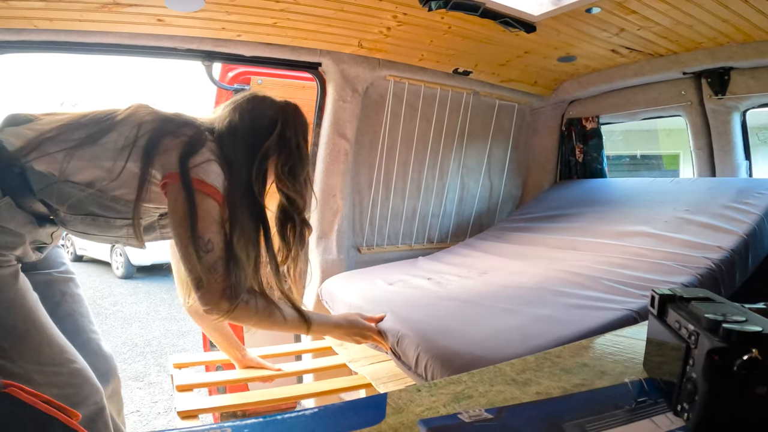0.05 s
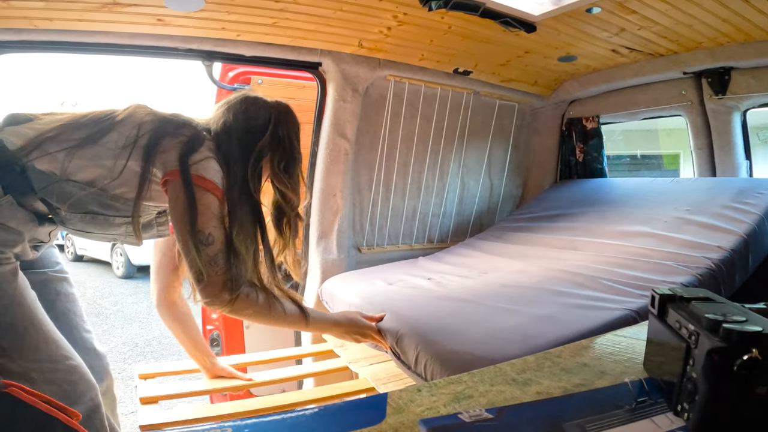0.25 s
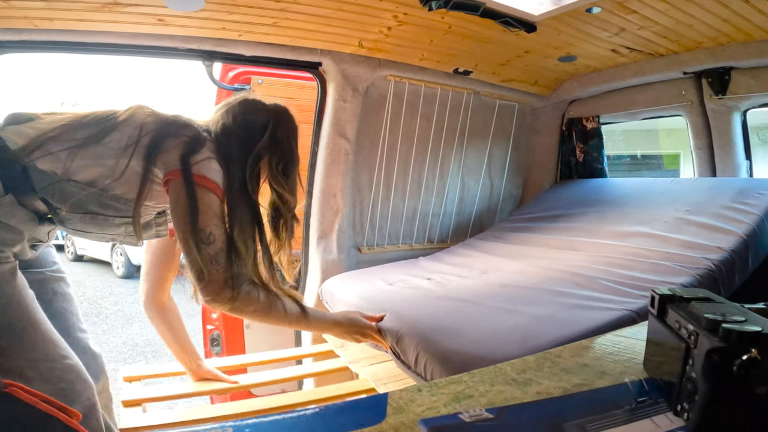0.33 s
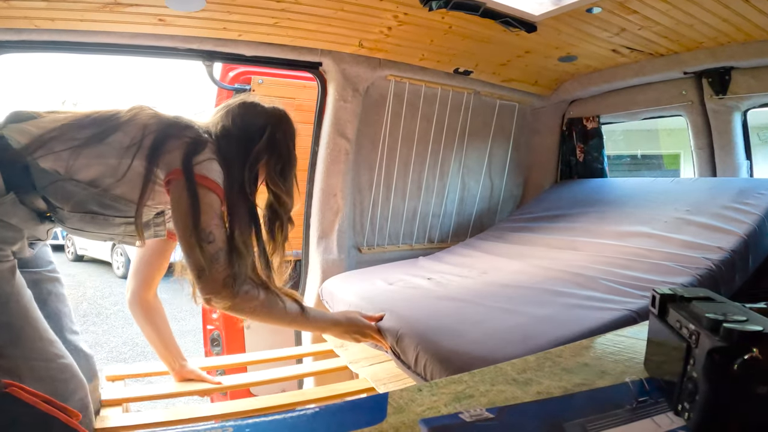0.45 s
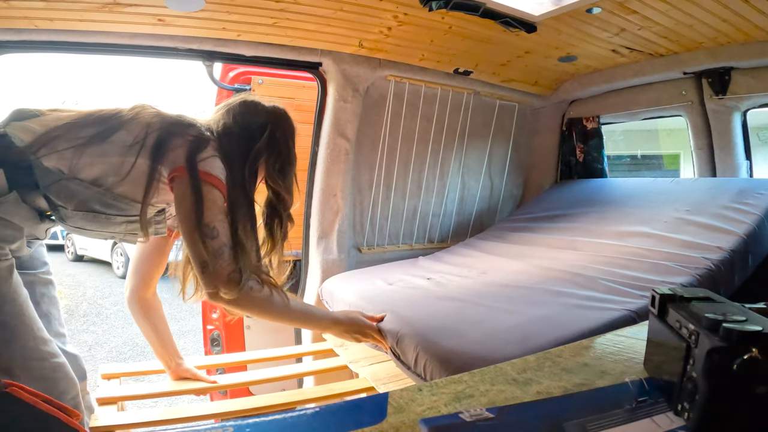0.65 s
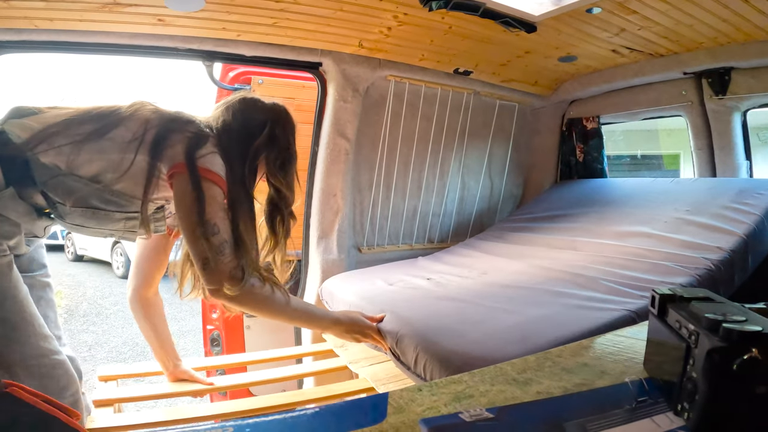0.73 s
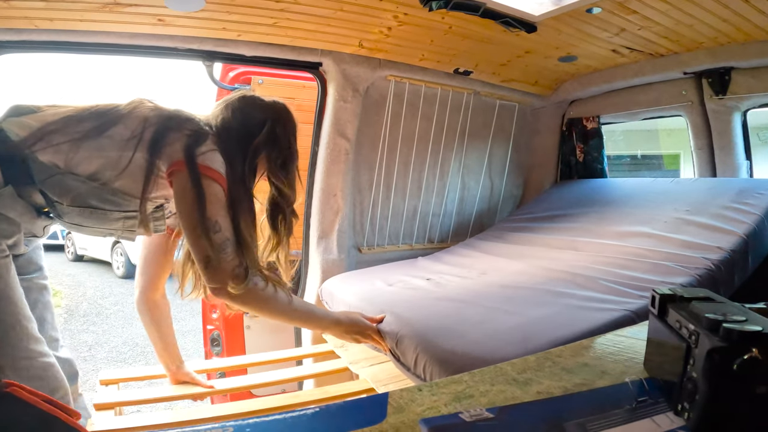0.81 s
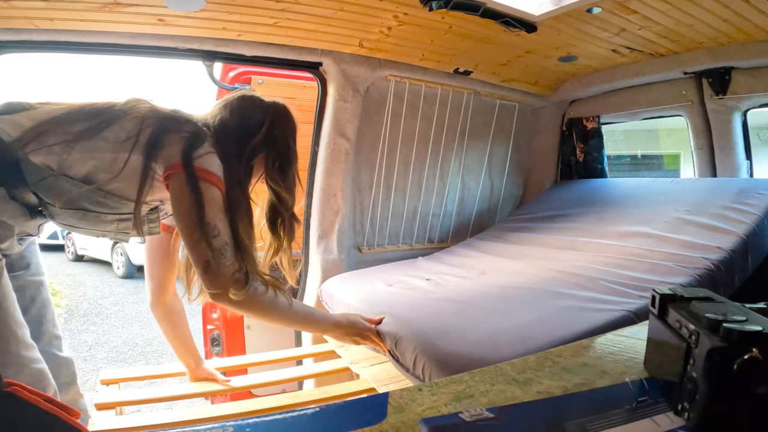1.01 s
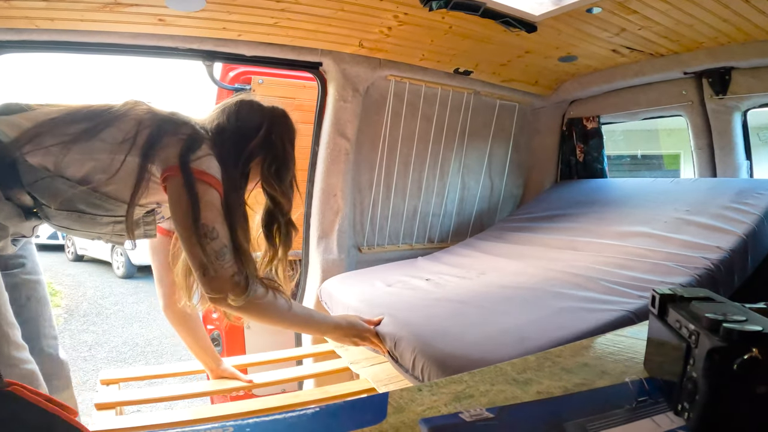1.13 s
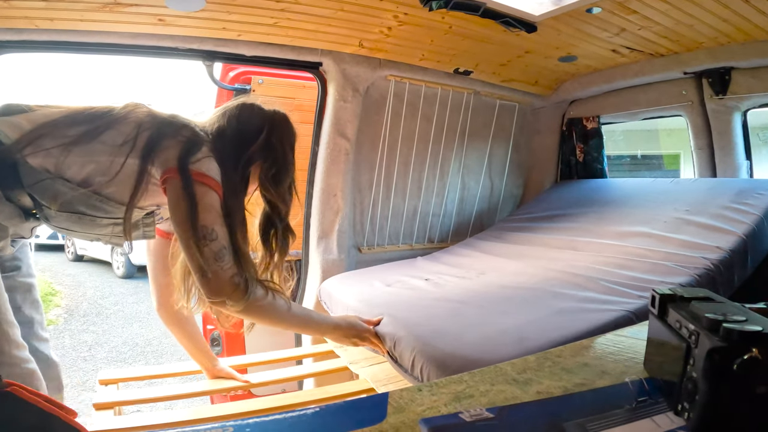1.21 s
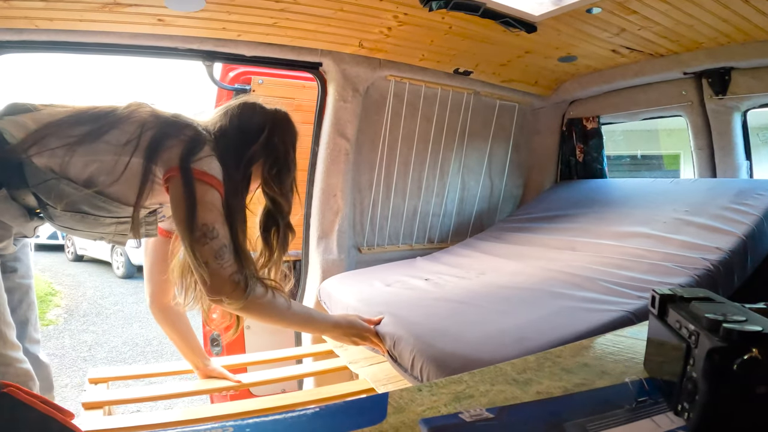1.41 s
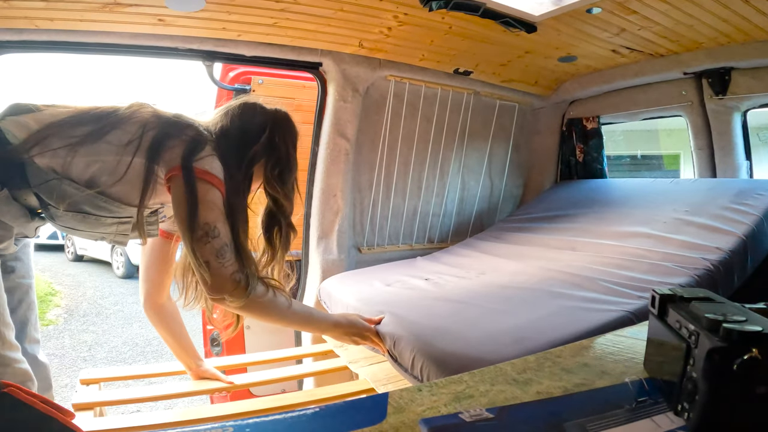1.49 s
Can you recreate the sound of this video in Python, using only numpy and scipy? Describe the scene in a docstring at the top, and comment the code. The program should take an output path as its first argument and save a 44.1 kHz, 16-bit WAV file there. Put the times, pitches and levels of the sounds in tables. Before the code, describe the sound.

Wooden slats scrape and knock as a couch base is dragged, then thump down.

```python
"""The slatted base of a pull-out couch is dragged out inside a small van.
Stick-slip friction makes the slats scrape and judder; impacts excite the wood's damped modes as they
knock hard against the frame, slide on and settle with a dull thump. Loose slats tap lightly.
The mattress cover swishes over the wood, fibre by fibre, and the dragging starts again.
Faint outdoor noise enters through the open door."""
import sys
import numpy as np
from scipy import signal
from scipy.io import wavfile

SR = 44100
rng = np.random.default_rng(int(sys.argv[2]) if len(sys.argv) > 2 else 0)


def dump(signal):
    """Clip the signal to [-1, 1] and save it as 16-bit WAV at the path in sys.argv[1]."""
    limited = np.clip(np.atleast_2d(signal).T, -1, 1)
    pcm = np.round(limited * 32767).astype(np.int16)
    wavfile.write(sys.argv[1], SR, pcm)


N = 68355


def amp(db):
    """Amplitude ratio of a level in decibels."""
    return 10 ** (np.asarray(db) / 20)

def unit(x):
    """Normalisation to rms 1."""
    return x / np.sqrt(np.mean(x ** 2) + 1e-20)

def add(mix, onset_s, sound):
    """Superposition of a delayed sound on the mix."""
    part = mix[max(round(onset_s * SR), 0):][:len(sound)]
    part += sound[:len(part)]

def colour(x, spectrum, size=8192):
    """Minimum-phase filtering by a spectrum (f/Hz, level/dB); the result has rms 1."""
    f, db = np.transpose(spectrum)
    hz = abs(np.fft.fftfreq(size, 1 / SR))
    log_gain = np.log(amp(np.interp(np.log(hz + 1), np.log(f), db)))
    response = np.exp(np.conj(signal.hilbert(log_gain)))
    impulse = np.fft.ifft(response).real[:size // 2]
    return unit(signal.fftconvolve(x, impulse)[:len(x)])

def grains(per_s, spread_db):
    """Shot noise: tiny independent impacts of random size and sign."""
    size = amp(spread_db * np.minimum(rng.exponential(1, N), 4))
    return unit(size * rng.choice([-1, 1], N) * (rng.random(N) < per_s / SR))

def decay(t60, size=24000):
    """Exponential damping: 60 dB in t60 seconds."""
    return np.exp(-np.log(1000) * np.arange(size) / SR / t60)

def burst(spectrum, t60):
    """Dense damped vibrations merge into decaying noise, starting near rms 1."""
    envelope = decay(t60)
    noise = rng.standard_normal(len(envelope)) * envelope
    return np.sqrt(np.mean(envelope ** 2)) * colour(noise, spectrum)

def mode_ring(modes, build_cycles, size=24000):
    """Impulse response as a sum of damped modes, each swelling with a time constant of build_cycles."""
    t, ring = np.arange(size) / SR, np.zeros(size)
    for hz, db, t60 in modes:
        swell = 1 - np.exp(-t * hz / build_cycles)
        ring -= amp(db) * swell * decay(t60, size) * np.sin(2 * np.pi * hz * t)
    return signal.lfilter(*signal.butter(3, 88, "high", fs=SR), ring)  # deep bass hardly radiates


# spectrum of the outdoor air: f/Hz, level/dB
AIR_SPECTRUM = [(25, -14), (60, -5), (90, 4.5), (130, 3.5), (190, 4.5), (280, -2.5), (400, -6.5),
                (560, -25.5), (780, -7), (1300, -14), (3000, -25), (6000, -34), (11000, -49), (14000, -59)]

def outdoor_air():
    """Stationary noise, strongest in the bass, enters through the open door."""
    return amp(-51.5) * colour(rng.standard_normal(N), AIR_SPECTRUM)


def cabin(x, t60=0.087, wet_db=-9.5, shift_hz=3.98, patterns=3):
    """Reverberation: dense reflections off the van's panels, their pattern shifting as the slats move."""
    t, wet = np.arange(N) / SR, np.zeros(N)
    for k in range(patterns):
        tail = grains(per_s=2000, spread_db=0) * decay(t60, N)
        share = np.sqrt(2 / patterns) * np.cos(np.pi * (shift_hz * t + k / patterns))
        wet += signal.fftconvolve(x * share, tail / np.linalg.norm(tail))[:N]
    return x + amp(wet_db) * wet


# strokes of the cover: peak t/s, level/dB, 20 dB rise/s, 20 dB fall/s, relative ring/dB, relative hiss/dB
COVER_STROKES = [(.03, -55, 0.035, 0.079, -24, -6.5), (.08, -43.5, 0.016, 0.051, -7, -23),
                 (0.824, -44, 0.094, 0.14, -13, -17), (.96, -61, .12, 0.23, -23, -8.5),
                 (1.072, -47, 0.036, 0.077, -1, -11.5), (1.116, -38.5, 0.02, 0.068, -0.5, -27),
                 (1.156, -41.5, 0.092, 0.062, -18, -11.5), (1.227, -58, 0.052, 0.095, -24, -3.5),
                 (1.335, -54.5, 0.15, 0.19, -20, -6.5), (1.535, -51, 0.13, 0.11, -10, -10.5)]
# spectra of the brushing fibres and of their fine hiss: f/Hz, level/dB
BRUSH_SPECTRUM = [(300, -47), (1000, -13), (1400, -5.5), (1900, -4.5), (2400, -2), (3800, 1), (5200, -5),
                  (7000, -15), (8500, -21), (11000, -31.5), (14000, -65)]
HISS_SPECTRUM = [(1000, -28), (4000, -1.5), (6500, 6), (8500, -10.5), (11000, -5), (14000, -10)]
# narrow resonances of the rubbed cloth: f/Hz, bandwidth/Hz, level/dB
CLOTH_RESONANCES = [(2416, 26, 6), (2727, 35, 9.5), (3030, 28, 6), (3250, 110, -1.5), (3810, 120, -3.5),
                    (4070, 42, 1.5), (4360, 20, -5)]

def cover_swishes():
    """Friction noise of fibres on the slats: firm strokes excite resonances, light ones hiss finely."""
    t, out = np.arange(N) / SR, np.zeros(N)
    for peak_s, db, rise, fall, ring_db, hiss_db in COVER_STROKES:
        fibres = grains(per_s=7600, spread_db=1)
        brush = colour(fibres, BRUSH_SPECTRUM)
        hiss = colour(rng.standard_normal(N), HISS_SPECTRUM)
        rings = sum(amp(level_db) * signal.lfilter(*signal.iirpeak(hz, hz / width, fs=SR), fibres)
                    for hz, width, level_db in CLOTH_RESONANCES)
        envelope = amp(db - 20 * np.maximum((peak_s - t) / rise, (t - peak_s) / fall))
        out += envelope * (brush + amp(ring_db) * unit(rings) + amp(hiss_db) * hiss)
    return out


# force of the drag: t/s, relative level/dB
DRAG_FORCE = [(0, -17), (0.067, -17.5), (0.083, -8.5), (.18, -6), (.217, -5.5), (.25, 4.5), (.28, 0),
              (.335, -1.5), (.40, -4.5), (.445, -5.5), (.52, -9), (.565, -13.5), (.61, -29.5),
              (0.722, -22.5), (.87, -16.5), (1.01, -27), (1.12, -23), (1.252, -23.5), (1.37, -19),
              (1.44, -18), (1.53, -10.5)]
# spectrum of wood sliding on wood: f/Hz, level/dB
RASP_SPECTRUM = [(200, -5.5), (600, 6), (900, -1.5), (1350, 2), (1800, 1.5), (2300, 3.5), (3300, -0.5),
                 (4500, -4.5), (7000, -16.5), (8500, -25.5), (11000, -25.5), (14000, -23)]

def slat_rasp():
    """Sliding friction: the wood grain rasps with an amplitude proportional to the force of the drag."""
    force_db = np.interp(np.arange(N) / SR, *np.transpose(DRAG_FORCE))
    return amp(force_db - 33.5) * colour(grains(per_s=5000, spread_db=2.5), RASP_SPECTRUM)


# envelope of the judder: t/s, relative level/dB
JUDDER_ENVELOPE = [(0, -34.5), (0.068, -26), (0.099, -6.5), (.19, -3), (.217, -13), (0.249, 5), (.29, -0.5),
                   (.335, 2), (0.461, 3), (.51, -8), (.555, -8.5), (.63, -22), (.74, -25.5), (.87, -9),
                   (1.02, -23.5), (1.10, -14), (1.17, -25.5), (1.42, -39), (1.49, -14), (1.53, -12)]
# spectrum of the coarse slips: f/Hz, level/dB
JUDDER_SPECTRUM = [(25, -26.5), (60, -16.5), (90, 8), (120, -5.5), (180, -0.5), (280, 3), (400, -3),
                   (520, -5.5), (660, -4), (850, -21), (1500, -18.5), (4000, -91.5)]

def slat_judder(frame_ring, slips_per_s=320):
    """Stick-slip: the slats catch and let go, shaking the frame and driving its modes."""
    envelope_db = np.interp(np.arange(N) / SR, *np.transpose(JUDDER_ENVELOPE))
    shake = amp(-33.5) * colour(grains(slips_per_s, spread_db=1), JUDDER_SPECTRUM)
    ring = amp(-36.5) * unit(signal.fftconvolve(grains(slips_per_s, spread_db=1), frame_ring)[:N])
    return amp(envelope_db) * (shake + ring)


# spectra of the many weak panel modes and of the crack at the contact: f/Hz, level/dB
PANEL_SPECTRUM = [(50, -47), (100, -29), (200, 14), (350, 5.5), (650, -10), (1000, -16), (2000, -14),
                  (6000, -9.5)]
CRACK_SPECTRUM = [(60, -34), (250, -16), (700, 7), (1300, 3), (2500, 1), (4000, -4.5), (7000, -14.5),
                  (8500, -30), (11000, -26), (14000, -60)]

def impacts(blows, ring, shakes_panels=True):
    """Impact excitation: the contact cracks and the wood rings; soft blows reach only the low modes."""
    out = np.zeros(N)
    for onset_s, db, corner_hz, crack_db in blows:
        clatter = amp(-25) * burst(PANEL_SPECTRUM, t60=0.24) if shakes_panels else 0
        body = signal.lfilter(*signal.butter(2, corner_hz, fs=SR), ring + clatter)
        crack = amp(crack_db - 24) * burst(CRACK_SPECTRUM, t60=0.085)
        add(out, onset_s, amp(db) * (body + crack))
    return out


# light taps of loose slats: t/s, level/dB, low-pass corner f/Hz, relative crack/dB
LOOSE_TAPS = [(.127, -16, 1220, -21), (.157, -13.5, 940, -9), (.179, -10.5, 1200, -15),
              (.3648, -6.5, 1110, 0), (.4105, -6.5, 1010, -5.5), (.463, -13.5, 1200, -18),
              (.632, -24, 900, -27), (.669, -24.5, 990, -20), (.709, -32, 795, -20),
              (.757, -32.5, 503, -20), (.864, -16.5, 586, -17), (1.073, -17, 400, -29),
              (1.101, -18, 396, -23), (1.513, -20, 680, -15), (1.531, -18, 587, -26)]
# modes of a loose slat: f/Hz, level/dB, T60/s
LOOSE_MODES = [(278, -17, 0.037), (342, -10.5, 0.036), (495, -14.5, 0.042), (565, -17, 0.047),
               (650, -16.5, 0.039), (1020, -22, 0.023)]

def slat_taps():
    """Free vibration of loose slats: quickly damped, it leaves the panels still."""
    return impacts(LOOSE_TAPS, mode_ring(LOOSE_MODES, build_cycles=0.75), shakes_panels=False)


# the base settling on its supports: t/s, level/dB, low-pass corner f/Hz, relative crack/dB
SETTLING_BLOWS = [(.5595, -14, 254, -8), (.578, -44, 88.2, -15), (.612, -19.5, 104, -19),
                  (.874, -13, 250, -25), (.8998, -1, 1200, -27), (.9052, 1.5, 277, -33),
                  (.9171, -21, 202, -37), (.977, -17, 352, -23), (1.043, -17, 98, -27),
                  (1.112, -22.5, 252, -19), (1.194, -23, 154, -22)]
# modes of the hollow couch box: f/Hz, level/dB, T60/s
COUCH_MODES = [(89.8, -16, 0.24), (138.7, -17.5, 0.15), (152, -12.5, 0.064), (207.7, -28.5, 0.31),
               (298, -15.5, 0.051), (340, -19, 0.058), (481, -16.5, 0.016), (548, -31.5, 0.031),
               (810, -33, .05), (1180, -38, 0.019)]

def base_thumps():
    """Resonance of the hollow box: its low modes answer the settling base with dull thumps."""
    return impacts(SETTLING_BLOWS, mode_ring(COUCH_MODES, build_cycles=0.61))


# blows of the slats on the frame: t/s, level/dB, low-pass corner f/Hz, relative crack/dB
FRAME_BLOWS = [(.1785, -20.5, 704, -17), (.199, -22, 503, 11), (.281, -13.5, 700, -6),
               (.3408, -17, 1820, 13.5), (.3431, 0, 850, 0), (.3575, -1.5, 750, -11), (.3785, -11, 810, -8),
               (.4115, -11.5, 800, -8), (.4305, -20, 910, 12.5), (.4615, -22, 910, -5)]
# modes of the slatted frame: f/Hz, level/dB, T60/s
FRAME_MODES = [(90.2, -32, 0.51), (145.8, -15.5, .07), (180.4, -3, .07), (220, -18, 0.21),
               (266.4, -4.5, 0.053), (397, -13, 0.044), (577, -10, 0.037), (663, -22, 0.13),
               (813, -50, 0.22), (918, -30, 0.064), (1147, -18.5, 0.075), (1329, -14.5, 0.034)]

def slatted_frame():
    """Forced and free vibration: the same modes judder under the drag and ring after each hard knock."""
    ring = mode_ring(FRAME_MODES, build_cycles=0.42)
    return slat_judder(ring) + impacts(FRAME_BLOWS, ring)


def scene():
    """Superposition in one channel of air, reverberant friction noise and vibrating wood."""
    air = outdoor_air()
    friction = cabin(cover_swishes() + slat_rasp())
    wood = slat_taps() + base_thumps() + slatted_frame()
    return (air + friction + wood)[None]

def record(dry, notch_hz=9080, notch_width_hz=760):
    """The microphone's frequency response: treble notch, low cut and roll-off, then the band limit."""
    notched = signal.lfilter(*signal.iirnotch(notch_hz, notch_hz / notch_width_hz, fs=SR), dry)
    thinned = signal.lfilter(*signal.butter(2, 30, "high", fs=SR), notched)
    dulled = signal.lfilter(*signal.butter(6, 11900, fs=SR), thinned)
    band_limit = signal.firwin(511, 13900, window=("kaiser", 9), fs=SR)
    return signal.oaconvolve(dulled, band_limit[None], "same")


dry = scene()
out = record(dry)
dump(out)
```